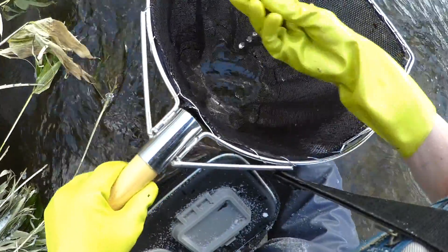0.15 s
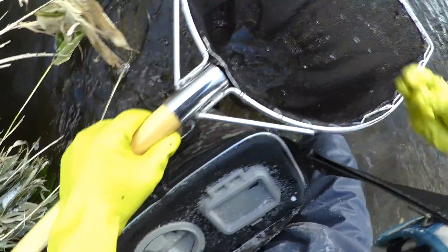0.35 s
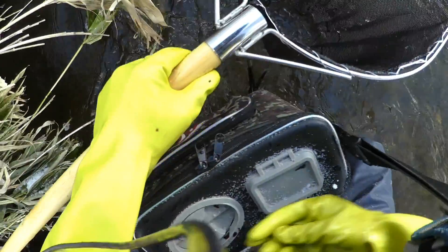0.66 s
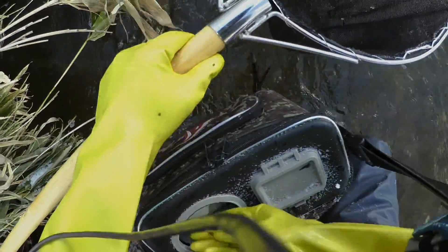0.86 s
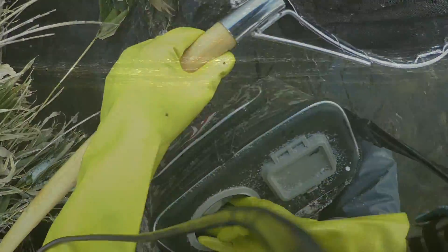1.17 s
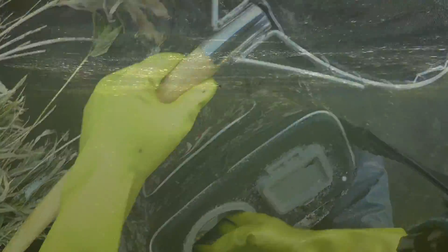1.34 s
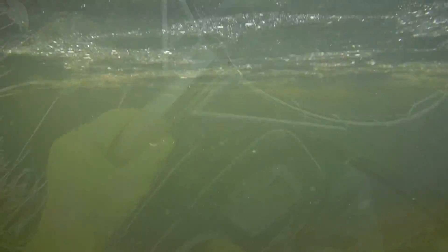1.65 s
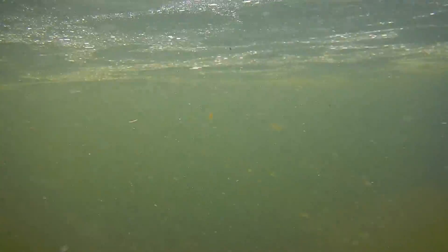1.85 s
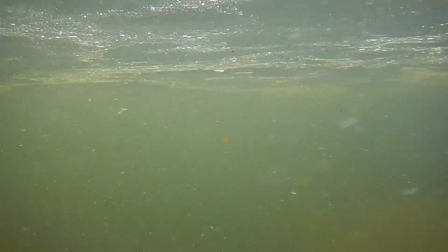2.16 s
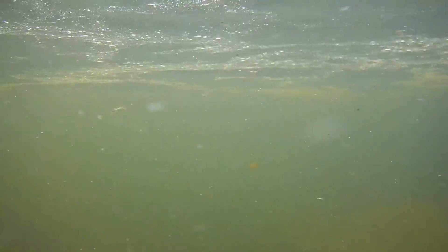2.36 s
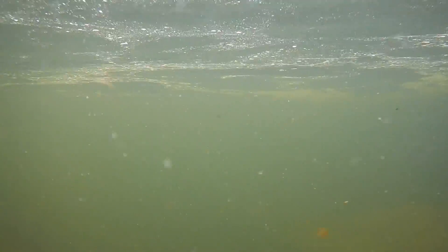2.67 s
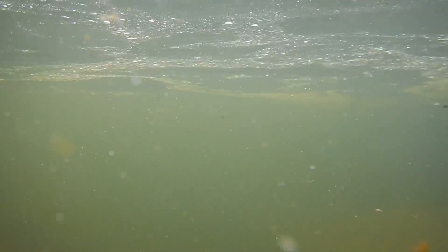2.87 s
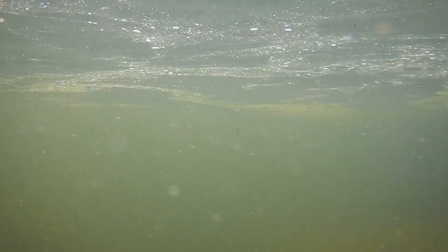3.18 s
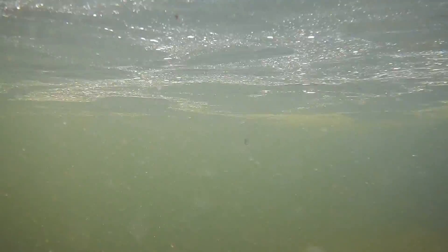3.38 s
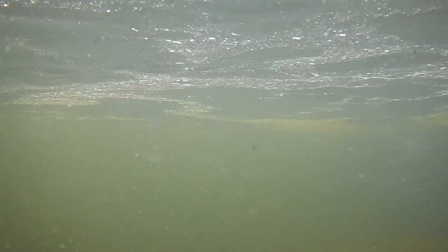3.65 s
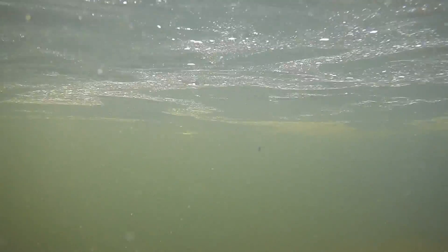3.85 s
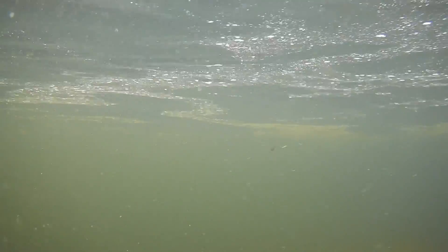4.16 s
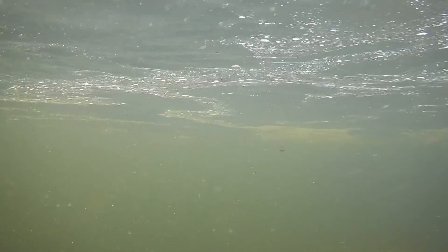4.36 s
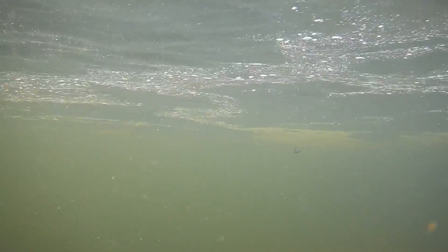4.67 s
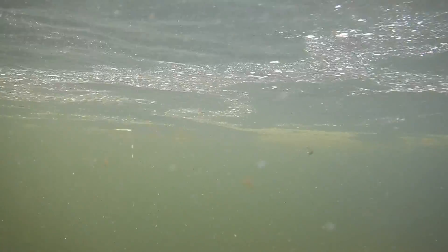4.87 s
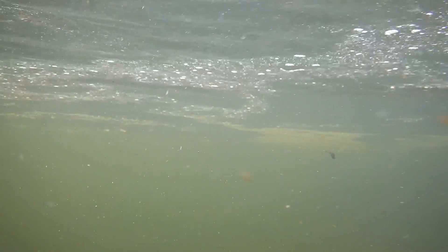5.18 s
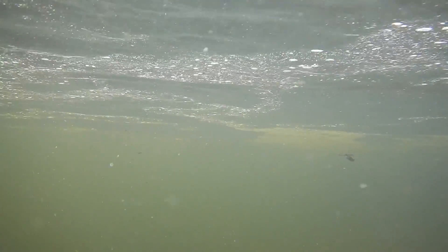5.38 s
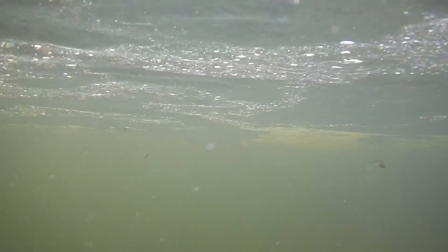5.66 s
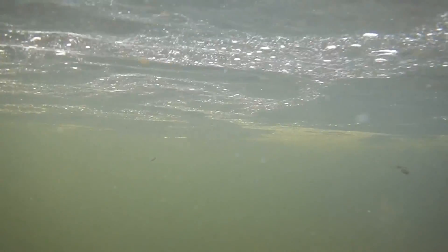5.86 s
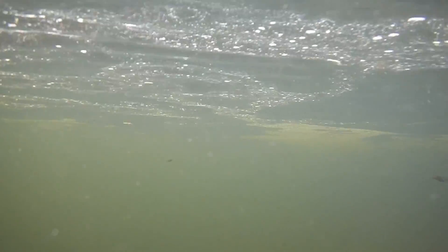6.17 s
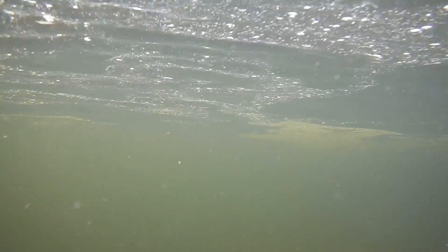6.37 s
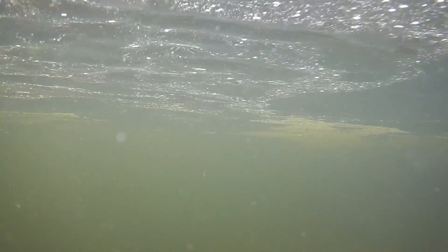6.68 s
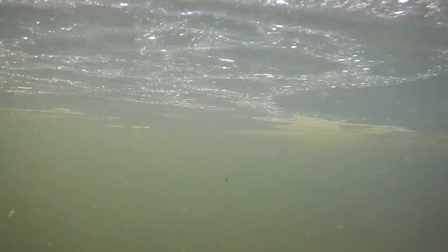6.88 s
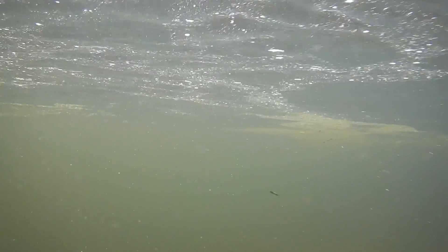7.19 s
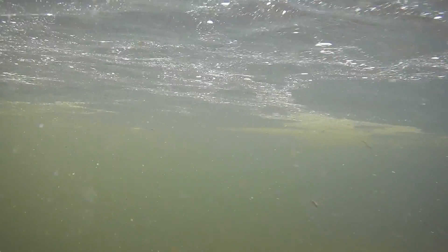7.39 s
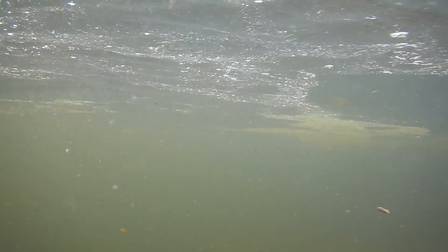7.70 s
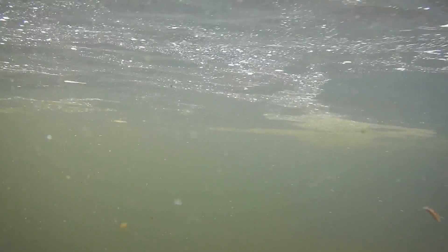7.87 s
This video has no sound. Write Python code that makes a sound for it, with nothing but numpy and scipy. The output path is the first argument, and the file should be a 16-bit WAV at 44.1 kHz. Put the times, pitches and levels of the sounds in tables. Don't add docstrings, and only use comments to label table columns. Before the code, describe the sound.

River water rushes while rubber gloves judder and bump on net gear, then gulping and slapping wavelets give way to muffled underwater rumble and steady ticking.

```python
import sys
import numpy as np
from scipy import signal
from scipy.io import wavfile
from scipy.ndimage import uniform_filter1d

SR = 44100
rng = np.random.default_rng(int(sys.argv[2]) if len(sys.argv) > 2 else 0)


def boost(x):
    u = np.asarray(x, float) / 20
    return 10 ** u


def inscribe(sig):
    pcm = np.round(np.clip(np.atleast_2d(sig).T, -1, 1) * 32767)
    wavfile.write(sys.argv[1], SR, pcm.astype(np.int16))


N = 354123

CUT_S, LATCH_S = 1.234, .75475
FIRST_TICK_S, TICK_S = 1.9082, 1 / 14.985
RUB_REST_DB, FIZZ_REST_DB, BUMP_CYCLES = -58.5, -70.5, 2.2
SINK_DB_PER_OCT, HISS_SHUT_DB, LEAN_DB, GROWTH_DB = 8, -7, 2, 0.5
HOLLOW_DB = -14.5
HISS_DB, TREBLE_SHARE, CIRCUIT_DB, BUFFET_DB = -47, 1.3, -86.5, -48
GUST_DB, GUSTS_PER_S = 2., 11.
SHOVE_HZ, SHOVE_WIDTH_HZ, SHOVE_DB = 190, 220, -12
TICK_DB, TICK_SHARE, STRONG_WEAK_DB = -49, 2.1, 1.3

# f/Hz, density/dB
RUSH_SPECTRUM = [(24, -51), (40, -29), (102, 4.5), (145, 2.5), (179, -5.5), (266, -1), (349, -21.5),
                 (457, 0.5), (770, 0.5), (2680, -13), (3300, -19.5), (3750, -29), (4560, -60), (5150, -43),
                 (5600, -61), (7540, -84), (12800, -120)]
# t/s, level/dB
RUSH_LEVEL = [(0, -35), (.16, -35), (.43, -31.5), (.59, -30.5), (.74, -33), (.77, -32.5), (.89, -26.5),
              (1.0, -32.5), (1.234, -29)]
# f/Hz, density/dB
FIZZ_SPECTRUM = [(3410, -51), (5800, -20.5), (6310, -2.5), (7110, 3.5), (10600, -8.5), (12500, -6),
                 (14800, -2.5), (15600, 0), (16000, -40)]
# middle t/s, length/s, level/dB
FIZZES = [
    (.52, 0.83, -60),
    (.7555, 0.0058, -38.5),
    (.88, 0.18, -59),
    (1.06, 0.6, -65.5),
]
# t/s, length/s, boost/dB
SPLASHES = [(0.867, 0.016, 8), (0.936, 0.023, 1), (0.98, 0.047, 5.5), (1.09, 0.046, 3)]
# middle t/s, length/s, level/dB
RUBS = [
    (.6, 0.36, -36),
    (.89, 0.31, -25.5),
    (1.05, 0.63, -30),
    (1.15, .2, -35.5),
]
# t/s, peak/dB, f/Hz
BUMPS = [(.08, -29.5, 172), (.16, -24, 124), (.175, -28, 189), (.372, -30, 129), (.571, -24, 172),
         (.693, -24, 193), (.725, -25, 140), (.742, -24, 160), (0.7518, -19, 200), (0.7579, -14.5, 229),
         (.786, -18, 218), (0.794, -23, 230), (.805, -23, 187), (.817, -17, 215), (.832, -19, 208),
         (.844, -23, 180), (.858, -19, 179), (.869, -14, 280), (.88, -16, 200), (.893, -11.5, 198),
         (.911, -18, 245), (.926, -12, 235), (.946, -11, 251), (.962, -24, 200), (.993, -15.5, 182),
         (1.013, -19, 220), (1.022, -16, 181), (1.04, -18, 220), (1.056, -18, 213), (1.071, -20.5, 221),
         (1.087, -23, 187), (1.105, -26, 172), (1.123, -25, 170), (1.144, -24, 173), (1.158, -22, 190),
         (1.179, -26, 205), (1.192, -26, 247), (1.216, -19.5, 210), (1.227, -10.5, 190)]
# t/s, peak/dB, f/Hz, t60/s, thud re ring/dB
TAPS = [(0.071, -22, 1463, 0.056, -26), (0.116, -24, 476, 0.022, -4), (0.348, -29.5, 1100, 0.054, -20),
        (0.634, -27.5, 735, 0.025, -30), (1.052, -21.5, 602, 0.051, -15), (.8814, -30.5, 3000, .02, -20),
        (.8814, -42.5, 7500, .02, -20), (0.8814, -15, 1180, 0.01, -19), (0.9268, -24.5, 1560, 0.033, -12),
        (1.1159, -20, 1670, 0.014, -23)]
# f/Hz, level/dB, t60/s
LATCH_MODES = [(1750, -3.5, 0.01), (1950, -18.5, 0.018), (1450, -18, 0.027)]

# f/Hz, density/dB
HISS_SPECTRUM = [(300, -5), (580, 7.5), (720, -6.5), (1050, -2.5), (1240, -14.5), (1430, -8), (2000, -22),
                 (2620, -31), (3180, -19), (3650, -33), (4200, -39.5), (4800, -34.5), (6000, -35),
                 (9000, -55.5)]
# f/Hz, left-right/dB
HISS_PAN = [(500, -2), (700, 4), (1000, 11), (1500, 12), (2000, 7), (2700, 2.5), (4200, 0)]
# t/s, gain/dB
GAIN = [(1.87, -4), (2.0, -7), (2.28, -8.5), (2.37, -16), (2.7, -6), (3.0, -3), (3.3, 0), (8.03, 0)]
# f/Hz, density/dB
CIRCUIT_SPECTRUM = [(3600, -8.5), (5500, 7.5), (7000, 1.5), (9000, 5.5), (12000, 2), (15300, -5),
                    (15600, -30)]
# f/Hz, width/Hz, level/dB
PORTS = [(404, 430, -2), (341, 66, 1.5)]
# t/s, level/dB
EDDIES = [(1.87, -40.5), (2.06, -42.5), (2.13, -36.5), (2.29, -40.5), (2.54, -51), (2.7, -35.5),
          (2.8, -29.5), (2.93, -27), (3.12, -27.5), (3.18, -38.5), (3.28, -42), (3.42, -41), (3.5, -34.5),
          (3.6, -38.5), (4.15, -42), (4.37, -42), (4.5, -42), (5.8, -45), (6.24, -44), (7.15, -46),
          (8.03, -46.5)]
# f/Hz, density/dB
BUFFET_SPECTRUM = [(12, -31), (20, 2.5), (81, -2), (135, -3.5), (201, -7), (260, -4.5), (340, -55.5),
                   (570, -120)]
# middle t/s, length/s, level/dB
SURGES = [(1.65, 0.59, -39.5), (3.1, 0.48, -39), (3.35, .2, -42.5), (1.85, .15, -39), (3.49, 0.33, -39.5),
          (4.0, 1, -41), (6.3, 0.53, -58), (7.62, 0.15, -49)]

# open t/s, widest t/s, shut t/s, widest cavity f/Hz
GULPS = [(1.238, 1.27, 1.302, 420), (1.296, 1.38, 1.42, 550), (1.414, 1.44, 1.464, 1120),
         (1.458, 1.475, 1.494, 380), (1.506, 1.533, 1.582, 1500), (1.59, 1.61, 1.625, 700),
         (1.629, 1.673, 1.695, 1550), (1.712, 1.742, 1.768, 1500), (1.785, 1.811, 1.822, 1150),
         (1.83, 1.853, 1.872, 700)]
# narrow-neck cavity level/dB, wide-neck hiss level/dB, left-right/dB
GULP_LEVELS = [(-33.5, -43, -3.5), (-20, -38.5, -1), (-24.5, -35, 7.5), (-22, -37, -7), (-22.5, -31, 5),
               (-34.5, -55, -2), (-20, -27.5, 6.5), (-18, -23, 5.5), (-21.5, -27, 7), (-23, -41.5, -3)]
NECK_LATE = [1.3, .8, 1., 1., 1.05, 1.3, 2.2, 1.7, 1.1, 1.3]
NECK_EARLY = [1.4, 0.87, 1.2, 1.1, 1.35, 1.5, 1.9, 1.63, 1.8, 1.33]
# f/Hz, density/dB
SURFACE_SPECTRUM = [(350, -44.5), (600, 6), (781, -7.5), (919, -8.5), (1140, -6), (1420, -17.5),
                    (1810, -35), (2210, -13), (2500, -32), (3260, -28.5), (4570, -32), (6100, -50),
                    (7360, -34), (8550, -55.5), (12000, -82), (15600, -103), (22000, -120)]
# t/s, length/s, level/dB
WATER_FILM = (1.392, .024, -13)
# t/s, f/Hz, level/dB
OVERTONE = [(1.27, 1310, -63), (1.3, 1180, -44), (1.33, 1090, -34), (1.36, 1050, -56), (1.4, 940, -48.5),
            (1.418, 834, -50), (1.425, 850, -89)]
# t/s, peak/dB, f/Hz, left-right/dB, length/s
SLAPS = [(1.414, -22, 444, 2, 0.015), (1.455, -16, 394, -2, 0.033), (1.51, -25.5, 523, 7, 0.011),
         (1.54, -24.5, 1124, -0.5, .012), (1.551, -25.5, 760, 4, 0.011), (1.562, -21.5, 381, 0, 0.022),
         (1.334, -21.5, 351, -9, 0.033), (1.424, -26, 340, -10.5, 0.025), (1.599, -30, 377, -4, .015),
         (1.802, -29.5, 1000, -3, .008), (2.2523, -18, 350, -2, 0.0069), (1.632, -32, 395, 7, 0.0037),
         (1.643, -15, 396, 5, 0.023), (1.68, -24.5, 522, 15, 0.019), (1.714, -15.5, 440, 3, 0.008),
         (1.717, -18, 444, 14.5, 0.022), (1.731, -17, 1100, -2, 0.01), (1.754, -17.5, 635, 6, 0.0073),
         (1.784, -14.5, 397, 9, 0.017), (1.831, -16.5, 374, -5, 0.016), (1.856, -17.5, 513, 9, 0.0088),
         (1.894, -24.5, 446, 18.5, 0.0076), (1.277, -41.5, 1990, 10, 0.0071),
         (2.109, -33.5, 403, -5, 0.015), (1.299, -26.5, 337, -5, 0.046), (2.472, -43, 587, 4, 0.0076),
         (2.507, -42.5, 606, 3.5, 0.0057)]
# t/s, peak/dB, f/Hz, left-right/dB, length/s
REBOUND = [
    (2.2662, -19, 468, 14, .012),
    (2.271, -21, 345, -14, .013),
]
# t/s, peak/dB, f/Hz, left-right/dB
THUDS = [(1.399, -32, 130, 22.5), (1.468, -36, 129, 25), (1.491, -32.5, 129.8, 14), (1.626, -26, 151, 15),
         (1.705, -20, 171, 19.5), (1.998, -41, 219, -3), (3.462, -15, 173, -2), (3.876, -23.5, 93.5, -1),
         (4.022, -19.5, 108, -1.5), (4.127, -22, 102, 1), (4.438, -22.5, 198, 5), (4.86, -20, 121, 2),
         (5.396, -27.5, 80, -4), (5.583, -31.5, 62, 3), (5.702, -30.5, 69, 0.5), (5.938, -30, 67.4, 2),
         (6.251, -26.5, 70.6, -6.5), (6.638, -30, 71.6, -8), (6.887, -31.5, 74, 2), (7.043, -39, 149, 11),
         (7.242, -33.5, 101, 6), (7.46, -30.5, 100, 4), (7.585, -23.5, 104, -3), (7.608, -20.5, 122, 0),
         (7.86, -30.5, 101, -1)]
# t/s, level/dB, f/Hz, t60/s
PLOP = (1.8942, -31, 1700, .025)
# t/s, peak/dB, left-right/dB
GRIT = [(1.896, -51, 12), (2.021, -31, -1), (2.2595, -38, 1), (2.269, -47, 3), (2.311, -42, 8),
        (2.327, -41, 4.5), (2.363, -48, 11.5), (2.387, -34.5, 6), (2.734, -29, 5), (2.743, -47, 0),
        (2.768, -43, 3.5), (2.777, -47, -4), (2.7919, -26.5, 1.5), (2.807, -32, 5), (2.8155, -24.5, 13),
        (2.84, -25, 5), (2.8725, -37, 4), (2.9053, -24.5, 4), (2.9102, -38, 9), (2.976, -54, 6)]
# f/Hz, level/dB, t60/s
HOUSING_MODES = [(1100, 5.5, .006), (1730, -1, 0.013), (2192, -6, .004), (2906, -4, 0.012),
                 (3930, -11, .003), (5140, -8, .006), (7140, -12, .004), (9500, -17.5, .003)]
# t/s, level/dB
SNAPS = [(2.0195, -49.5), (2.7919, -66), (2.8153, -58), (2.839, -53), (2.9055, -65), (2.387, -66)]
# f/Hz, width/Hz, length/s, left/dB, right/dB
WHIRR = [(1460, 300, .026, -11, -22), (1850, 400, .017, -17, -27), (3050, 500, .02, -30, -33),
         (3700, 400, .018, -37, -37), (4650, 900, .02, -28, -29), (5900, 400, .018, -42, -43)]
MISSED_TICKS_S = [3.577, 4.311, 5.779, 7.781]
# t/s, peak/dB, left-right/dB
BLOWS = [
    (2.0179, -4.3, -2),
    (2.2585, -2.4, 2.4),
]
# f/Hz, t60/s
BLOW_PORT_MODES = [(440, .017), (345, .043)]
# f/Hz, level/dB, t60/s
BLOW_SHELL_MODES = [(1490, -34.5, 0.034), (2210, -45.5, .015), (2890, -59.5, 0.015)]
# t/s, length/s, step/full scale
OVERFLOW = (2.2607, .00025, 1.6)
# t/s, peak/dB, f/Hz, length/s
WHIRLS = [(2.786, -22, 318, 0.021), (2.828, -26.5, 348, .025), (2.906, -21.5, 334, 0.02),
          (2.946, -22, 318, 0.024), (3.013, -24.5, 370, 0.022), (3.028, -20.5, 347, .035),
          (3.067, -20.5, 314, .035), (3.116, -21.5, 300, .025)]
# t/s, peak/dB, f/Hz, left-right/dB, length/s
KNOCKS = [(3.288, -30, 326, -8, 0.017), (3.383, -22, 280, -9, 0.016), (3.432, -38, 297, 3, 0.019),
          (3.474, -13, 299, -5.5, 0.017), (3.507, -15.5, 296, -10, 0.02), (3.837, -21, 252, -4, 0.01),
          (3.869, -33, 318, -4, 0.023), (3.896, -26.5, 314, -7, 0.015), (3.952, -22, 295, -13.5, 0.011),
          (4.038, -22, 253, -8, 0.014), (4.141, -23.5, 318, -16, 0.017), (4.172, -20, 334, -10, 0.026),
          (4.228, -23, 331, -12, 0.017), (4.313, -28, 340, -9, 0.015), (4.445, -27, 330, -16.5, 0.036),
          (4.569, -36, 277, -0.5, 0.018), (4.649, -31, 343, -11, 0.017), (4.868, -28.5, 331, -14, 0.021),
          (4.917, -32, 340, -9, 0.015), (5.313, -32, 366, -7, 0.018), (5.39, -24, 343, -11, 0.017),
          (5.436, -30, 336, -9, 0.026), (5.592, -29, 323, -14, 0.016), (5.712, -26, 372, -6, 0.016),
          (5.911, -30, 242, -2.5, 0.015), (6.219, -39, 282, -10, 0.024), (6.244, -27.5, 340, -3.0, 0.021),
          (6.266, -29, 342, -13, 0.024), (6.377, -31, 336, -13, 0.023), (6.654, -31, 340, 8, 0.011),
          (6.711, -29.5, 350, -4, 0.016), (6.784, -28.5, 380, -10, 0.027), (6.982, -28, 250, 0.0, 0.01),
          (7.115, -48, 318, 5, 0.012), (7.252, -24.5, 340, -13, 0.0074), (7.435, -25, 330, -10, 0.021),
          (7.62, -37, 243, 0, 0.026), (7.621, -25.5, 300, -8, 0.017), (7.704, -38, 317, -1.0, 0.015),
          (7.874, -30, 316, -12, 0.0093)]


def evened(x):
    return x / np.sqrt(np.mean(x ** 2) + 1e-20)


def read(points, hz):
    f, value = np.transpose(points)
    return np.interp(np.log(hz + 1), np.log(f + 1), value)


def columns(rows):
    s, *rest = np.transpose(rows)
    return [np.interp(np.arange(N) / SR, s, c) for c in rest]


def add(mix, s, sound):
    part = mix[..., round(s * SR):][..., :sound.shape[-1]]
    part += sound[..., :part.shape[-1]]


def sides(pan_db):
    return boost(np.array([pan_db / 2, -pan_db / 2]))


def resonate(x, hz, width_hz):
    turn = np.exp(2j * np.pi * np.cumsum(hz * np.ones(len(x))) / SR)
    r = np.exp(-np.pi * width_hz / SR)
    return 2 * (turn * signal.lfilter([1 - r], [1, -r], x / turn + 1e-18)).real


def ring(hz, t60_s, rise_s):
    t = np.arange(round(t60_s * SR)) / SR
    shape = boost(-60 * t / t60_s) * (1 - np.exp(-t / rise_s)) * np.sin(2 * np.pi * hz * t)
    return shape / abs(shape).max()


def burst(hz, length_s):
    u = np.linspace(0, 1, round(np.clip(length_s, .003, .05) * SR))
    return np.sin(np.pi * u ** 0.84) ** 2 * np.sin(2 * np.pi * hz * np.arange(len(u)) / SR)


def noise(spectrum, patchy_db, flicker_db, same, pan=((1, 0), (2, 0)), size=512):
    frames, hz = 4 * N // size + 5, np.fft.rfftfreq(size, 1 / SR)
    a, b, c, d, patches = rng.standard_normal((frames, len(hz), 5)).T
    patches = evened(uniform_filter1d(uniform_filter1d(patches, size=5, axis=0), size=12, axis=1))
    flicker = evened(uniform_filter1d(rng.standard_normal(frames), size=4))
    same, left = np.clip(same, -1, 1), a + 1j * b
    right = same * left + np.sqrt(1 - same ** 2) * (c + 1j * d)
    z = np.array([left, right]) * sides(read(pan, hz))[:, :, None]
    outside = (hz < spectrum[0][0]) | (hz > spectrum[-1][0])
    colour_db = np.where(outside, -100, read(spectrum, hz))
    z *= boost(colour_db[:, None] + patchy_db * patches + flicker_db * flicker)
    return evened(signal.istft(z, nperseg=size, noverlap=3 * size // 4)[1][:, :N])


def lumps(per_s, spread_db, soft_s):
    size = boost(spread_db * np.minimum(rng.exponential(1, N), 4)) * rng.standard_normal(N)
    pushes = size * (rng.random(N) < per_s / SR)
    return evened(signal.oaconvolve(pushes, np.hanning(round(soft_s * SR)))[:N])


def swells(rows, rest_db):
    t, humps = np.arange(N) / SR, np.zeros(N)
    for s, length_s, db in rows:
        humps += boost(db) * np.cos(np.pi * np.clip((t - s) / length_s, -.5, .5)) ** 2
    return 20 * np.log10(boost(rest_db) + humps)


def drift(per_s):
    steps = rng.standard_normal(round(12 * N / SR))
    return evened(np.interp(np.arange(N) / SR * per_s, np.arange(len(steps)), steps))


def muffle(x, edge_hz):
    return signal.sosfilt(signal.butter(3, edge_hz, fs=SR, output="sos"), x)


def hollow(x, note_hz):
    above = x - resonate(x, .45 * note_hz, 700.)
    return above + boost(HOLLOW_DB) * (x - above)


def river():
    rush_db, = columns(RUSH_LEVEL)
    splash_db = np.zeros(N)
    for s, length_s, db in SPLASHES:
        add(splash_db, s, db * np.hanning(round(length_s * SR)))
    rush = boost(rush_db - 1.0) * noise(RUSH_SPECTRUM, 1.6, 1.2, 0.51)[0]
    fizz = boost(swells(FIZZES, FIZZ_REST_DB)) * noise(FIZZ_SPECTRUM, 1.3, 1.3, 0.93)[0]
    bubbles = sum(resonate(lumps(45, 3., .0003), hz, 0.03 * hz) for hz in np.geomspace(500, 1900, num=8))
    return boost(splash_db) * (rush + fizz) + boost(rush_db - 23.0) * evened(bubbles)


def glove():
    judder = resonate(resonate(lumps(600, 1.0, 0.0018), 210, 200), 190, 430)
    out = boost(swells(RUBS, RUB_REST_DB) - 3.5) * evened(judder)
    for s, db, hz in BUMPS:
        jolt = burst(hz, BUMP_CYCLES / hz)
        add(out, s - 0.44 * len(jolt) / SR, boost(db) * jolt)
    return out


def click(db):
    return boost(db) * rng.standard_normal(90) * np.exp(-np.arange(90) / 25.)


def taps():
    out = np.zeros(N)
    for s, db, hz, t60_s, thud_db in TAPS:
        add(out, s, boost(db) * ring(hz, t60_s, .0009))
        add(out, s, click(db - 46))
        add(out, s - .003, boost(db + thud_db) * ring(330, 0.0084, 0.00077))
    return out


def latch():
    out = np.zeros(N)
    add(out, LATCH_S - .0003, boost(-8) * ring(540, .008, .0004))
    for hz, db, t60_s in LATCH_MODES:
        add(out, LATCH_S, boost(db) * ring(hz, t60_s, .00045))
    add(out, LATCH_S, boost(-34.0) * rng.standard_normal(90) * np.exp(-np.arange(90) / 24.0))
    return out


def water_hiss(gain_db):
    hiss = noise(HISS_SPECTRUM, 2.0, 1.0, 0.19, HISS_PAN, size=1024)
    dull = signal.sosfiltfilt(signal.butter(3, 2500, fs=SR, output="sos"), hiss)
    return boost(HISS_DB + gain_db) * (dull + boost(TREBLE_SHARE * gain_db) * (hiss - dull))


def circuit_hiss(gain_db):
    level_db = CIRCUIT_DB + 0.8 * (gain_db - gain_db[-1])
    return boost(level_db) * noise(CIRCUIT_SPECTRUM, .6, .3, 0)


def eddies():
    level_db = columns(EDDIES)[0] + GUST_DB * drift(GUSTS_PER_S)
    shared = lumps(1200, 2.3, 0.0018)
    ports = []
    for hz, width_hz, db in PORTS:
        push = shared + .5 * lumps(1500, 0.87, 0.0014)
        pocket = resonate(resonate(push, 0.981 * hz, 1.06 * width_hz), 1.04 * hz, 330.0)
        ports.append(boost(db) * evened(pocket))
    shove = resonate(resonate(shared, SHOVE_HZ, SHOVE_WIDTH_HZ), SHOVE_HZ, SHOVE_WIDTH_HZ)
    return boost(level_db + 0.5) * muffle(muffle(ports, 630), 630) + boost(level_db + SHOVE_DB) * evened(shove)


def buffeting():
    return boost(swells(SURGES, BUFFET_DB) + 2.5) * noise(BUFFET_SPECTRUM, 2.94, 2.8, 0.79, size=2048)


def gulps():
    out, film_db = np.zeros((2, N)), np.zeros(N)
    film_s, film_length_s, film_level_db = WATER_FILM
    add(film_db, film_s, film_level_db * signal.windows.tukey(round(film_length_s * SR), .2))
    hiss = noise(SURFACE_SPECTRUM, 0.98, 0.58, 0.13, size=256) * boost(film_db)
    for times, levels, late, early in zip(GULPS, GULP_LEVELS, NECK_LATE, NECK_EARLY):
        opens, widest, shuts, top_hz = times
        narrow_db, wide_db, side_db = levels
        span = slice(round(opens * SR), round(shuts * SR))
        t = np.arange(span.start, span.stop) / SR
        neck = np.interp(t, [opens, widest, shuts], [0, 1, 0]) ** np.where(t < widest, late, early)
        hiss_db = wide_db + HISS_SHUT_DB * (1 - neck) ** 2
        pan_db = side_db + LEAN_DB * (2 * neck - 1)
        growth_db = GROWTH_DB * (t - opens) / (shuts - opens)
        shared, *own = rng.standard_normal((3, len(t)))
        for ch, (hz, _, _) in enumerate(PORTS):
            note_hz = hz + (top_hz - hz) * neck
            cavity_db = narrow_db - SINK_DB_PER_OCT * np.log2(note_hz / hz) + growth_db
            cavity = resonate(resonate(shared + .2 * own[ch], note_hz, 25.), note_hz, 90.)
            cavity /= np.sqrt(uniform_filter1d(cavity ** 2, size=350) + 1e-12)
            sound = boost(cavity_db) * sides(pan_db)[ch] * cavity
            sound += boost(hiss_db + 2.0) * hollow(hiss[ch, span], note_hz)
            out[ch, span] += sound * signal.windows.tukey(len(t), .2)
    return muffle(out, 8500)


def overtone():
    hz, db = columns(OVERTONE)
    note = resonate(resonate(rng.standard_normal(N), hz, 60.), hz, 200.)
    return boost(db) * evened(note) * (np.arange(N) > OVERTONE[0][0] * SR)


def slaps():
    out = np.zeros((2, N))
    for s, db, hz, pan_db, length_s in SLAPS + REBOUND:
        add(out, s, -boost(db) * sides(pan_db)[:, None] * burst(hz, length_s))
    return out


def thuds():
    out = np.zeros((2, N))
    for s, db, hz, pan_db in THUDS:
        add(out, s + .016, boost(db + 2) * sides(pan_db)[:, None] * ring(1.3 * hz, 2.6 / hz, .002))
    return muffle(out, 800)


def plop():
    out = np.zeros((2, N))
    s, db, hz, t60_s = PLOP
    add(out, s, boost(db) * sides(10.)[:, None] * ring(hz, t60_s, .0005))
    return muffle(out, 8500)


def grit():
    out = np.zeros((2, N))
    for s, db, pan_db in GRIT:
        strike = np.zeros(2000)
        for hz, mode_db, t60_s in HOUSING_MODES:
            add(strike, 0, boost(mode_db) * ring(hz * rng.uniform(0.906, 1.05), t60_s, 0.000051))
        rattle = 0.15 * rng.standard_normal((2, 500)) * np.exp(-np.arange(500) / 190.0)
        rattle[:, 0] = 2.5
        struck = muffle(signal.fftconvolve(rattle, strike[None], axes=1), 8000)
        add(out, s, boost(db - 25.0) * sides(pan_db)[:, None] * struck)
    for s, db in SNAPS:
        crack = muffle(rng.standard_normal((2, 150)), 10500) * np.exp(-np.arange(150) / 35.)
        add(out, s, boost(db) * crack)
    return out


def motor():
    tick_db, out = TICK_DB + TICK_SHARE * columns(GAIN)[0], np.zeros((2, N))
    near_left = sides(10.5)[:, None]
    for k, s in enumerate(np.arange(FIRST_TICK_S, N / SR, TICK_S)):
        db = tick_db[round(s * SR)] + 1. + 1.2 * rng.standard_normal()
        db -= STRONG_WEAK_DB * (-1) ** k
        db -= 11 * (abs(s - np.array(MISSED_TICKS_S)).min() < TICK_S / 2)
        add(out, s, boost(db + 5) * near_left * burst(1680 * rng.uniform(.92, 1.08), .0032))
        add(out, s + .008, boost(db - 8) * near_left * burst(1450 * rng.uniform(.96, 1.04), .011))
        add(out, s, boost(db - 17) * ring(3000 * rng.uniform(.9, 1.7), .005, .0004))
        add(out, s + 0.0042, boost(db - 11.0) * ring(930, 0.0096, 0.0017))
        drive = rng.standard_normal((2, 1100))
        for hz, width_hz, length_s, *levels_db in WHIRR:
            buzz = np.array([evened(resonate(resonate(d, hz, width_hz), hz, width_hz)) for d in drive])
            buzz = buzz[:, :round(length_s * SR)]
            buzz = buzz * signal.windows.tukey(buzz.shape[1], .7)
            add(out, s - .002, boost(db + 9.5 + np.array(levels_db))[:, None] * buzz)
    return muffle(out, 4900)


def blows():
    out = np.zeros((2, N))
    for s, db, pan_db in BLOWS:
        for ch, (hz, t60_s) in enumerate(BLOW_PORT_MODES):
            add(out[ch], s, -boost(db) * sides(pan_db)[ch] * ring(hz, t60_s, .004))
    out = muffle(out, 800)
    for hz, mode_db, t60_s in BLOW_SHELL_MODES:
        add(out, BLOWS[0][0] + 0.0016, boost(mode_db - 3.0) * ring(hz, t60_s, 0.00103))
    return out


def whirls():
    out = np.zeros((2, N))
    for s, db, hz, length_s in WHIRLS:
        add(out, s, boost(db) * sides(-8.5)[:, None] * burst(hz, length_s))
    return muffle(out, 800)


def debris():
    out = np.zeros((2, N))
    for s, db, hz, pan_db, length_s in KNOCKS:
        add(out, s - 0.002, -boost(db - 4.0) * sides(pan_db)[:, None] * burst(hz, length_s))
    return muffle(out, 800)


def scene():
    t = np.arange(N) / SR
    fade_out = np.sin(np.pi / 2 * np.clip((CUT_S - t) / .0012, 0, 1)) ** 2
    bank = (river() + glove() + taps() + latch()) * fade_out
    gain_db, = columns(GAIN)
    current = water_hiss(gain_db) + circuit_hiss(gain_db) + eddies() + buffeting()
    under = current * np.clip((t - CUT_S) / .002, 0, 1)
    under += gulps() + overtone() + slaps() + thuds() + plop() + grit()
    under += motor() + blows() + whirls() + debris()
    return bank + np.array([np.roll(under[0], 2), under[1]])


def band_limit(x):
    return signal.sosfilt(signal.butter(12, 16660, fs=SR, output="sos"), x)


def record(dry):
    s, length_s, step = OVERFLOW
    near = round(s * SR) - 50
    crest_s = (near + np.argmax(dry[0, near:near + 100])) / SR
    out = dry.copy()
    add(out[0], crest_s - length_s / 2, np.full(round(length_s * SR), -step))
    out = signal.oaconvolve(out, signal.firwin(255, 16350, fs=SR)[None], "same")
    return band_limit(np.clip(out, -.99, .99))


dry = scene()
out = record(dry)
inscribe(out)
```